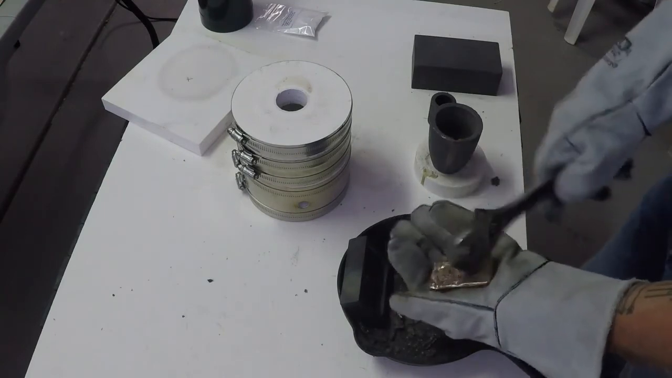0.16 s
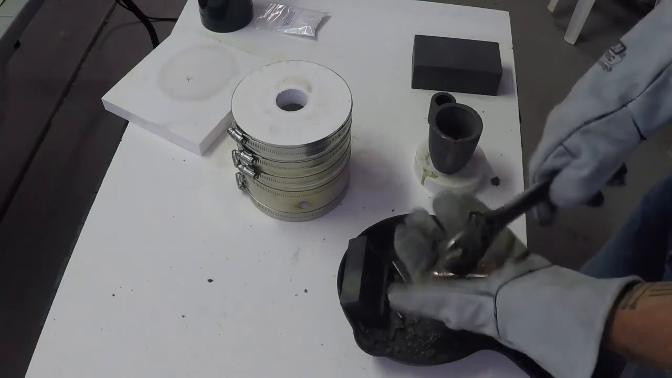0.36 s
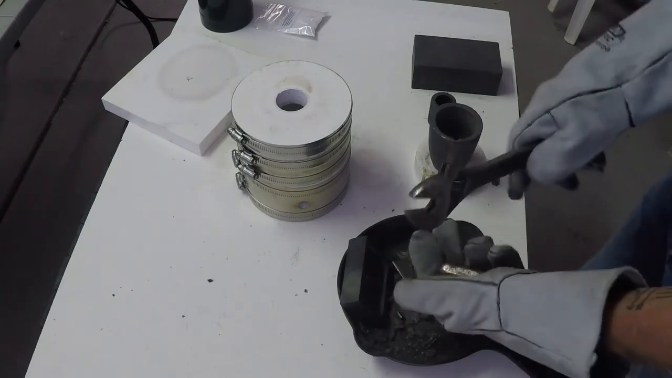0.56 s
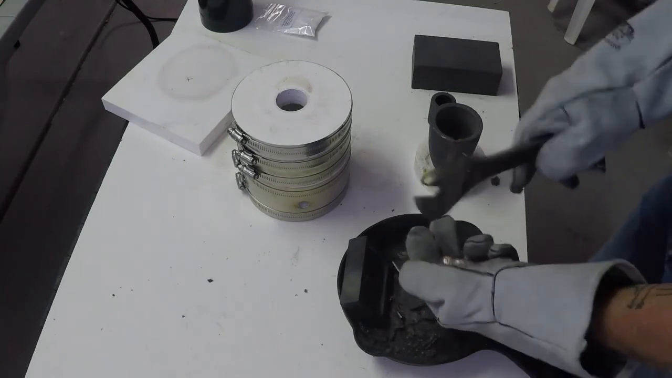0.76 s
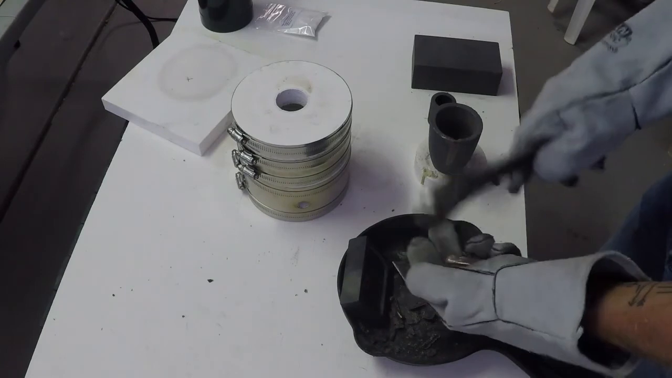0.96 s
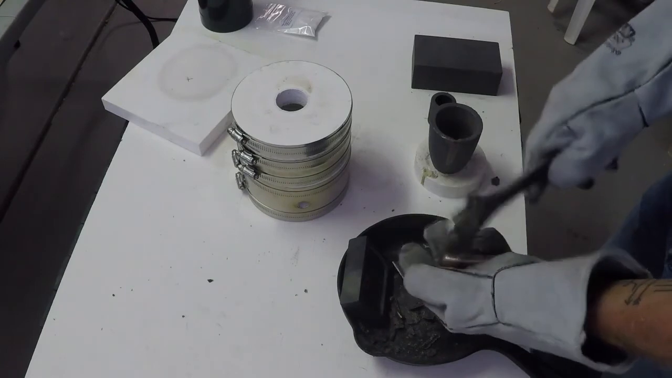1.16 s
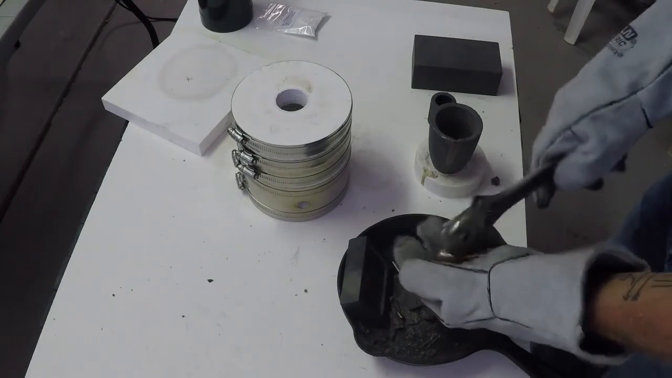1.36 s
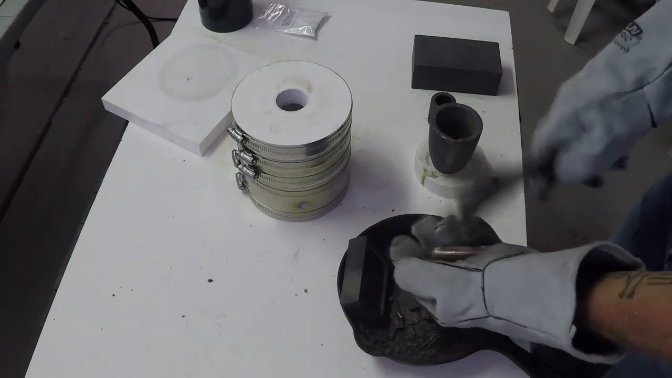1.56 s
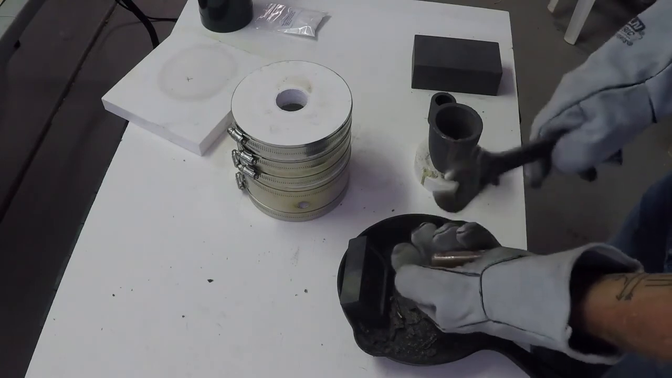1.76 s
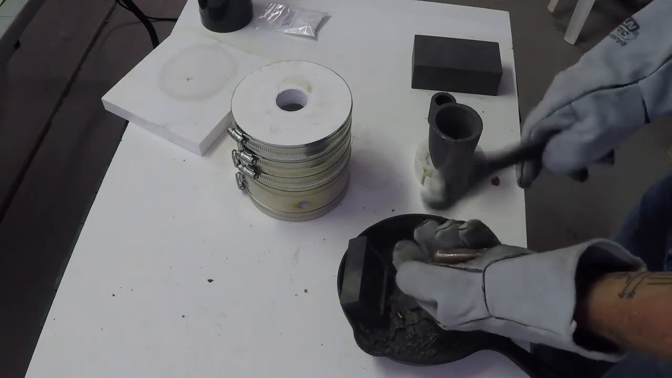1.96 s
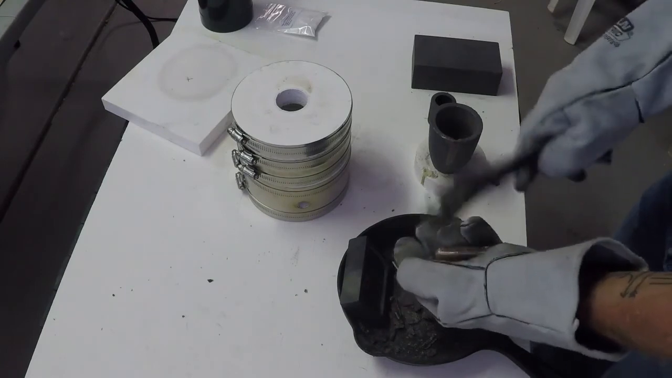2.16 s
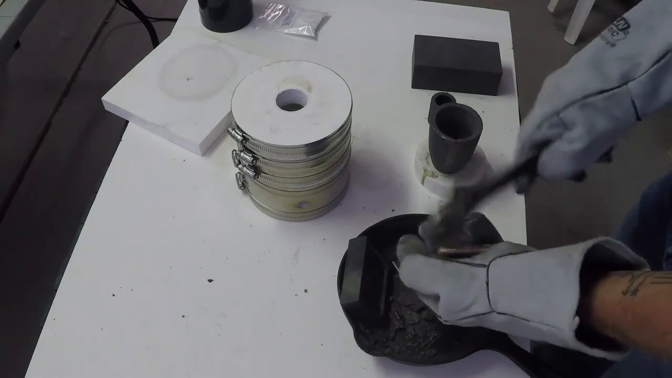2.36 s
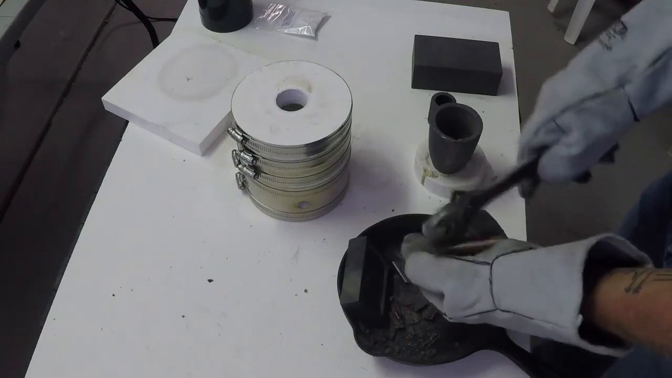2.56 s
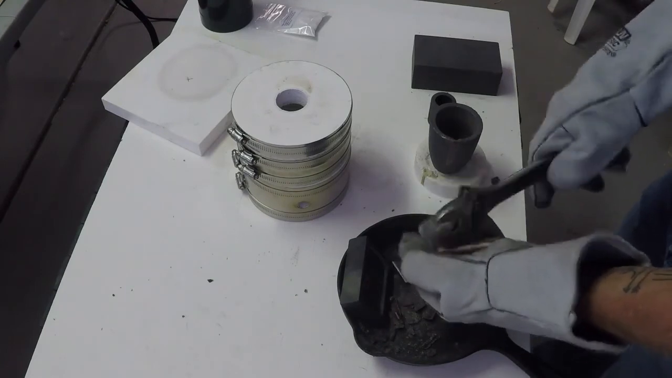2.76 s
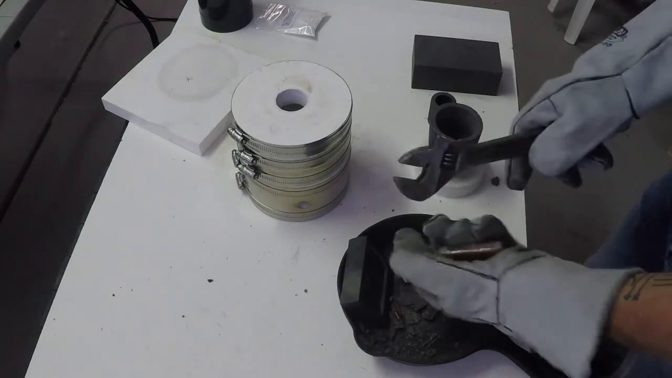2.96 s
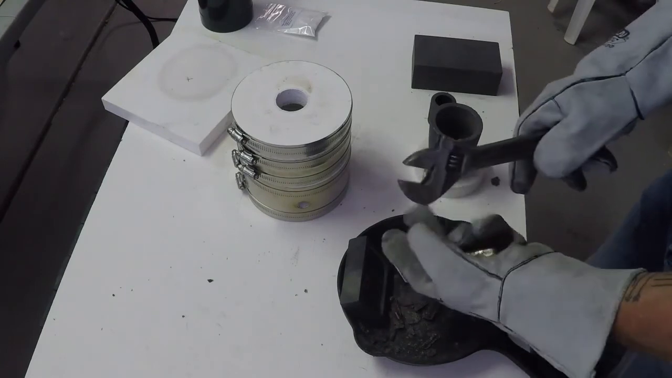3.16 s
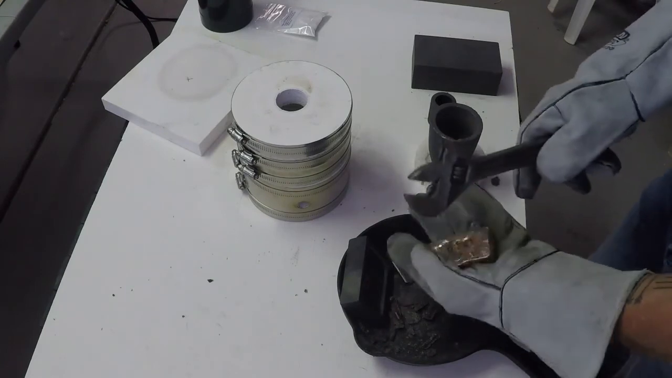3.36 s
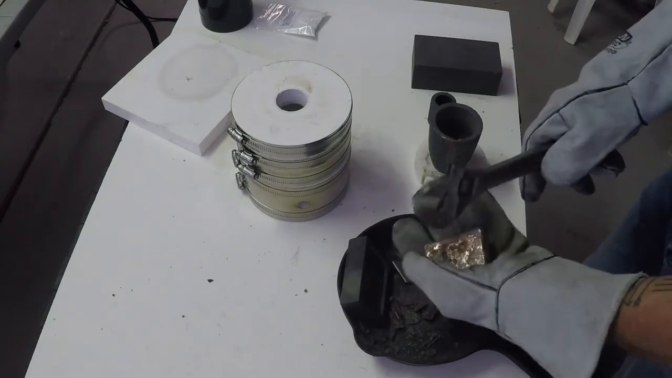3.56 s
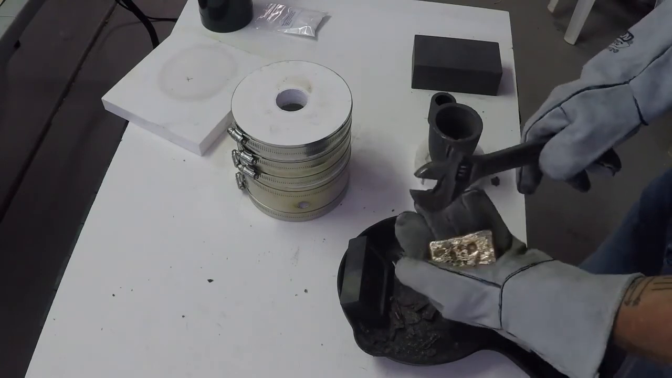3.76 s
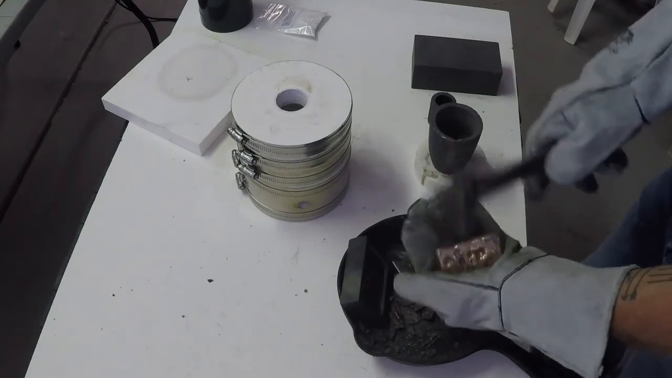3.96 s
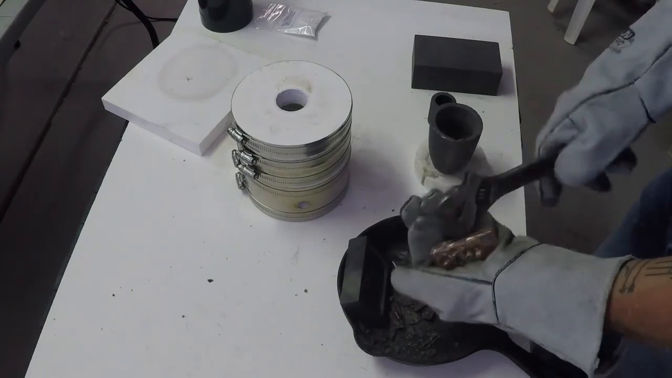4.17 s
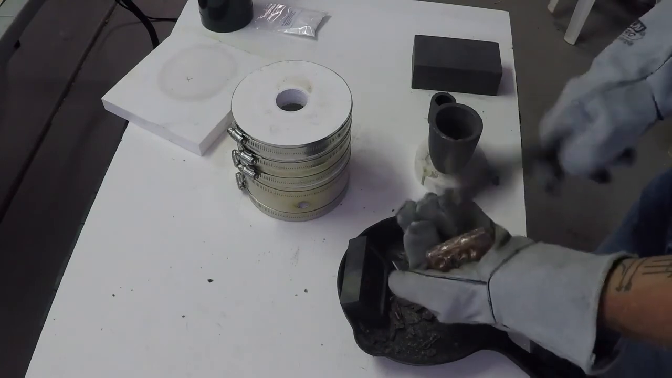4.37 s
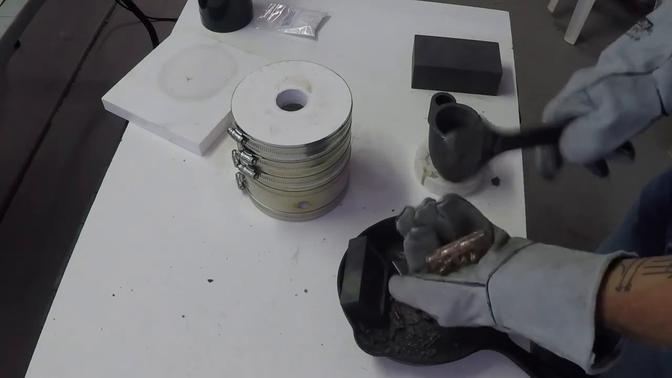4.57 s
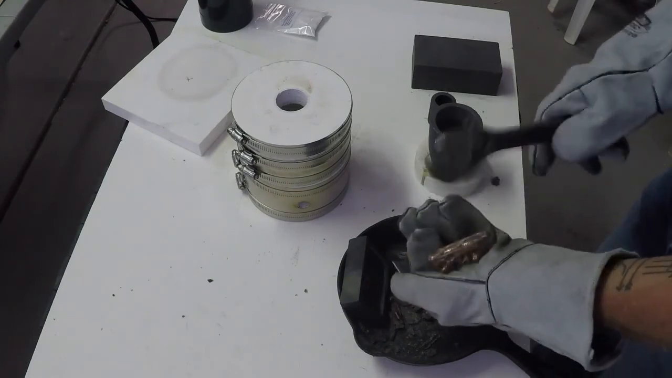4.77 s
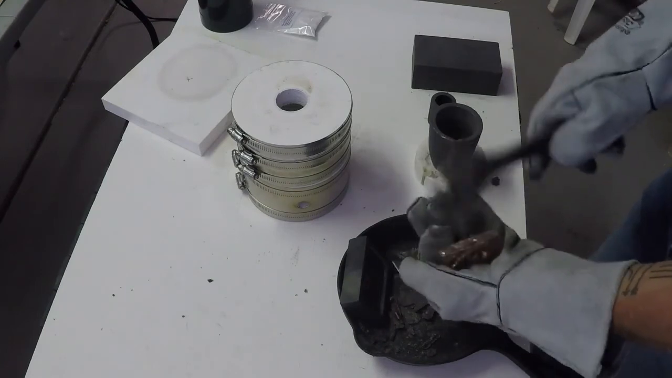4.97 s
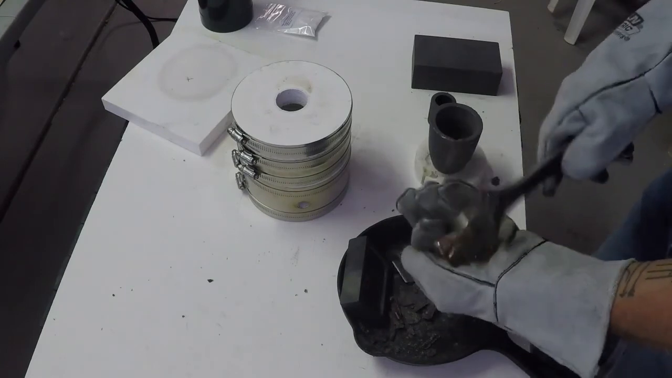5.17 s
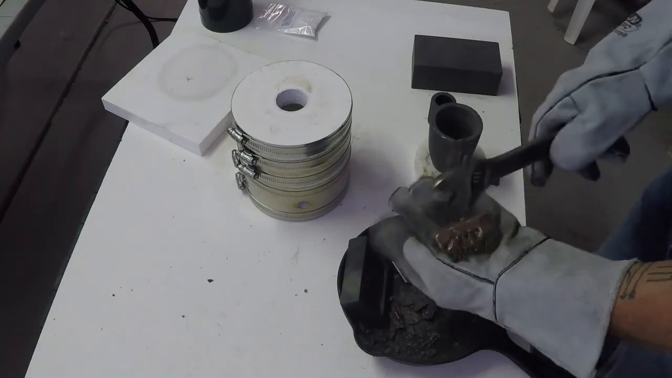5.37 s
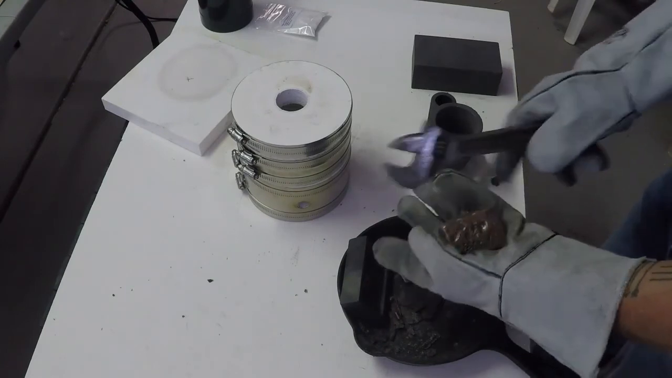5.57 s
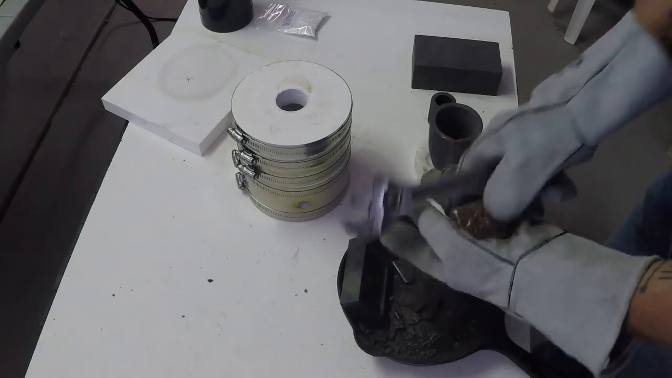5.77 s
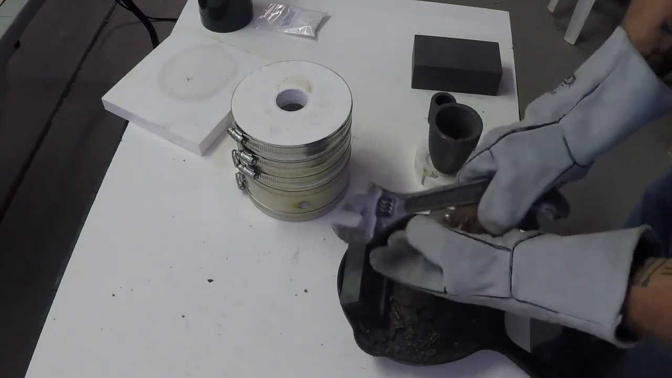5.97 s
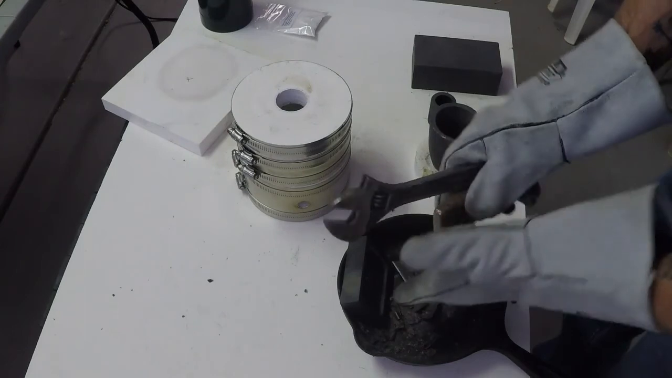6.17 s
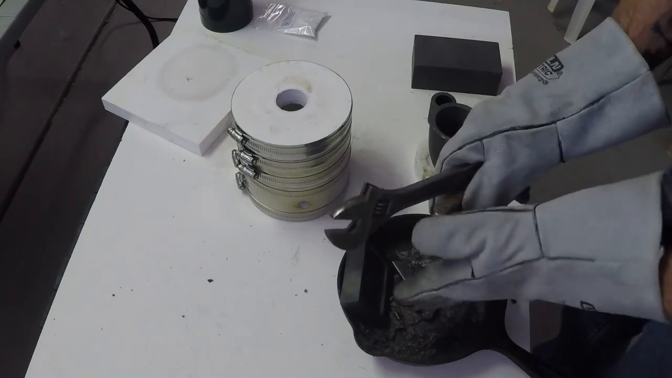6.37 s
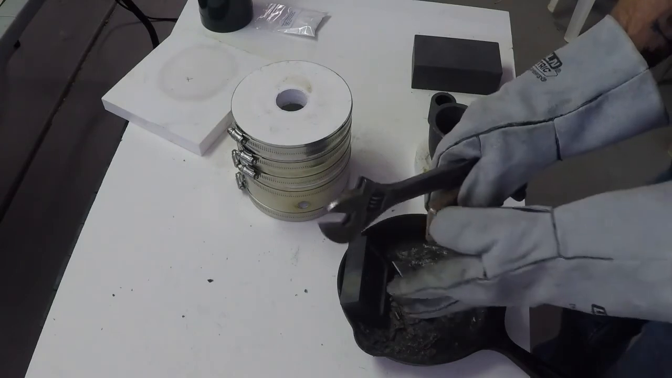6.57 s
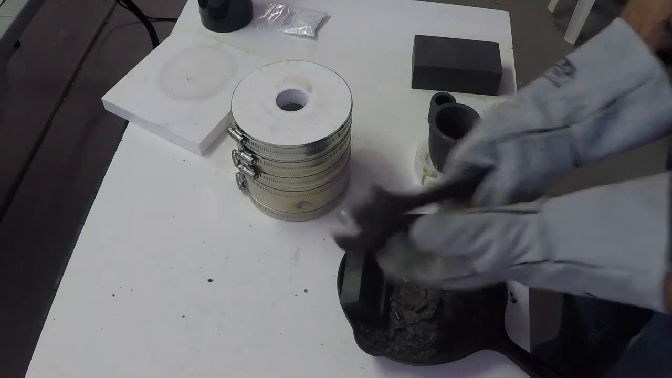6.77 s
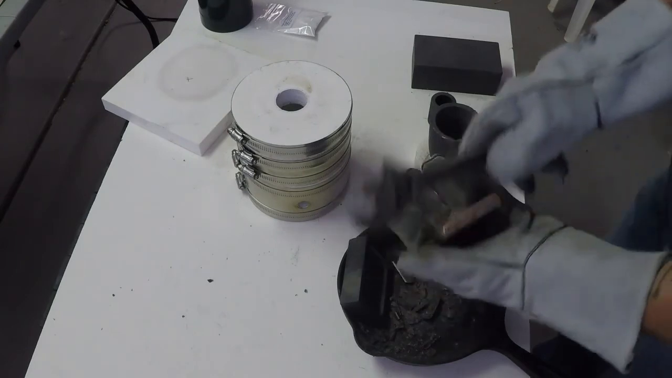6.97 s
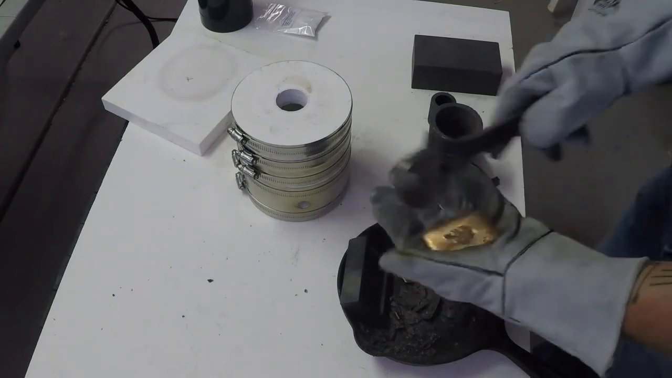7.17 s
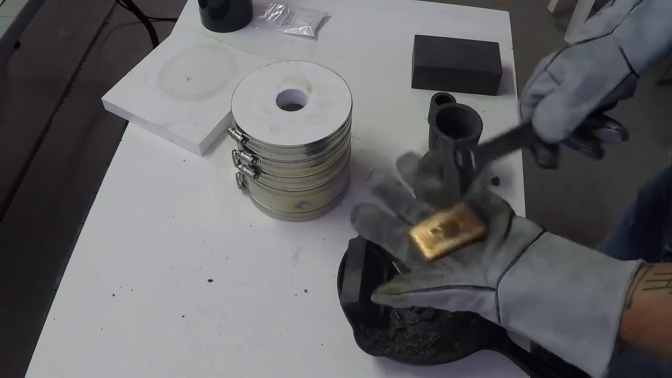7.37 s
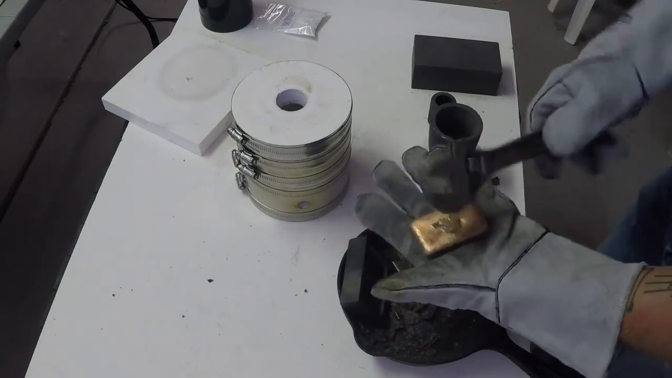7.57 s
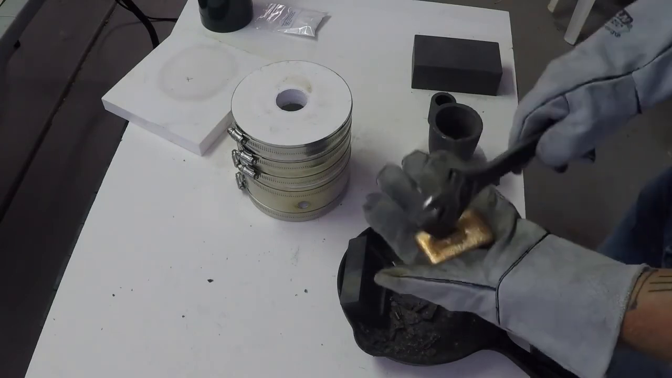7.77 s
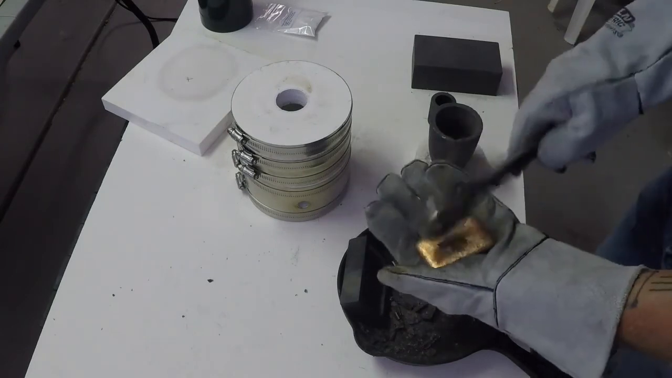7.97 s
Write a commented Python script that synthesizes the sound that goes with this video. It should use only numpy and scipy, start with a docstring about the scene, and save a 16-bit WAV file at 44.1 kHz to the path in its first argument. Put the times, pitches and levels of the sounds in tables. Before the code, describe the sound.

A close microphone in a small hard-walled workshop, with a faint low air rumble and motor hum throughout. A wrench hits a cast metal bar in a leather glove: loud, crunchy clinks at 0, 0.2 and 0.4 s, each a hard click, shattering glassy grit and a bright ring choked within hundredths of a second. The loose jaw rattles faintly around 0.6 s; a weak tap comes at 0.9. From 1.2 to 2.8 s, eight firm taps fall about every quarter second, varying in pitch and brightness. From 3.2 to 3.8 s leather slides softly and snaps as the bar is turned. Six more taps run from 4.0 to 5.2 s, the first and last lighter, some ringing brighter. Between 5.7 and 6.6 s, small dull snaps and chips tick and tinkle in an iron pan. A barely audible touch at 6.9, then a single light ringing clink at 7.8 s, with short room echo.

```python
"""Wrench tapping the crust off a metal bar

A wrench taps a cast metal bar held in a leather glove, cracking off its glassy crust of flux.
Each tap is a short pressure wave, a burst of crunchy noise and a clink of modes soon damped by the glove.
Chips tick and ring in an iron pan, gloves rub as filtered noise, and fading noise makes the workshop's echo.
A machine hums faintly behind it all, made of steady tones and coloured noise."""
import sys
import numpy as np
from scipy import signal
from scipy.fft import rfft, irfft
from scipy.io import wavfile

SR = 44100
rng = np.random.default_rng(int(sys.argv[2]) if len(sys.argv) > 2 else 0)


def int16_out(signal):
    """Quantize to a 16-bit WAV file."""
    q = np.round(np.clip(np.atleast_2d(signal).T, -1, 1) * 32767)
    wavfile.write(sys.argv[1], SR, q.astype(np.int16))


N = 354115
LEAD = SR // 10  # samples of run-up before time zero
TIME = np.arange(SR // 3) / SR  # time axis of one short sound, in seconds


def amp(db):
    """Turns decibels into a gain."""
    return 10 ** (np.asarray(db) / 20)


def evened(x):
    """Scales a signal to rms 1."""
    return x / np.sqrt(np.mean(x ** 2) + 1e-20)


def read(points, hz):
    """Reads between the points of a table, on a log-frequency axis."""
    f, value = np.transpose(points)
    return np.interp(np.log(hz + 1), np.log(f + 1), value)


def noise(spectrum, size):
    """Makes noise of rms 1 with the given colour."""
    white = rfft(rng.standard_normal(size))
    gain = amp(read(spectrum, np.fft.rfftfreq(size, 1 / SR)))
    return evened(irfft(white * gain, size))


def drift(rate, size):
    """Makes a random wander of rms 1 that holds only frequencies below rate (Hz)."""
    white = rfft(rng.standard_normal(size))
    slow = np.fft.rfftfreq(size, 1 / SR) < rate
    return evened(irfft(white * slow, size))


def add(mix, s, sound):
    """Mixes a sound in at time s (seconds); the mix begins LEAD samples early."""
    part = mix[LEAD + round(s * SR):][:len(sound)]
    part += sound[:len(part)]


def burst(rise, t60):
    """An envelope that rises quickly, then falls by 60 dB every t60 seconds."""
    return (1 - np.exp(-TIME / rise)) * np.exp(-np.log(1000) * TIME / t60)


def ring(modes, detune):
    """Sums dying sine waves; each call varies pitch and level, the level most in high modes."""
    hz, db, t60 = np.transpose(modes)[:, :, None]
    level, pitch, phase = rng.standard_normal((3, len(modes), 1))
    height = amp(db + 3 * level * hz / 10000)
    wave = np.sin(2 * np.pi * (hz * (1 + detune * pitch) * TIME + phase))
    return (height * burst(0.00014, t60) * wave).sum(0)


# The taps of the wrench, used by the knocks, the crust and the ringing bar.
# Each row: start in seconds, force in dB, flux crunch in dB, ring in dB,
# brightness of the ring in dB per octave, spot hit as a share of the bar's length.
TAPS = [(-.021, 2, -1, 3.5, -2, 0.21), (0.1964, 4.5, 2.5, 2.5, 0.7, 0.24), (0.4225, -2, -7, 7.5, 1, 0.07),
        (0.9399, -16.5, -30, -16, -7.5, .292), (1.194, -5.5, -12, -4, -4.5, 0.29),
        (1.4283, -0.5, 2.5, 4.5, -1, 0.51), (1.6661, 2, 0.5, 2.3, 2, 0.16), (1.9039, 2.5, 0, 1.5, -3, 0.13),
        (2.1302, 2, -1.5, 6, 1, .215), (2.3492, 0, 3, 2, -3.2, .2), (2.5735, -2.5, -0.5, 0, 2, 0.33),
        (2.8181, -0.5, -1.5, 5, 1.3, 0.22), (3.961, -10, -22.5, -5, -4.5, 0.32),
        (4.2236, -5, 0, 1, -0.5, .177), (4.4676, -2.5, 0, 7, 9, .25), (4.701, -3, -5, -0.9, -1.8, 0.24),
        (4.9318, -1.5, -4.5, 7, -1, 0.27), (5.1774, -13, -7, 3, -3.5, 0.26),
        (6.8939, -37, -49.5, -30.5, -12, 0.2), (7.8006, -17, -27, -3.5, 3, 0.447)]
# Colour of breaking flux, for knocks, flakes and crust. Each row: frequency in Hz, level in dB.
CRUNCH_COLOUR = [(200, -17.5), (900, -2), (2200, 0.5), (3700, 1), (5600, 4), (8300, 3), (10300, -5),
                 (13500, -5), (15000, -18), (16000, -16)]


def knocks():
    """The sudden stop of the wrench head sends up a short pressure wave with a gritty edge."""
    out = np.zeros(N + LEAD)
    u = TIME - .00065
    wave = np.exp(-(u / 0.00032) ** 2) * np.sin(2 * np.pi * 3450 * u)
    for s, force_db, *_ in TAPS:
        edge = amp(-6.5) * noise(CRUNCH_COLOUR, len(TIME)) * burst(0.00085, 0.0045)
        add(out, s, amp(force_db) * (wave + edge))
    return out


THUD_DB, THUD_GROWTH = -13.5, .5  # thud level in dB at 0 dB force, and its change in dB per dB of force
# Colour of the gloved hand's thud. Each row: frequency in Hz, level in dB.
THUD_COLOUR = [(50, -15), (200, -26.5), (400, 0.5), (650, 3.5), (1000, -1), (1400, -5.5), (2200, -5.5),
               (4000, -39)]


def crust():
    """Under each blow the flux shatters in fine grains and the gloved hand thuds, more the harder it is hit."""
    out = np.zeros(N + LEAD)
    for s, force_db, crunch_db, *_ in TAPS:
        grains = evened(np.exp(.5 * drift(2500, size=len(TIME))))
        crunch = grains * noise(CRUNCH_COLOUR, len(TIME)) * burst(0.00025, 0.019)
        thud = noise(THUD_COLOUR, len(TIME)) * burst(0.0018, 0.023)
        thud_db = THUD_DB + THUD_GROWTH * force_db
        add(out, s + 0.00046, amp(-7 + crunch_db) * crunch + amp(thud_db) * thud)
    return out


GRIP_S = .02  # time scale in seconds on which the closing glove stops the ring
NODE_DB = -13  # what is left of a mode when the blow lands on its still point (node)
HIGH_SHARE = 0.3  # how far the highest modes follow the ring rather than the crunch
# Modes of bar and wrench together, three matching lists: frequency in Hz,
# level in dB before the blow's own weighting, ring time (60 dB fall) in seconds without the glove.
MODE_HZ = [1560, 1818, 2760, 2852, 4300, 4625, 4785, 6260, 6430, 7125, 7865, 8950, 9515, 10910, 11600,
           12000, 12960, 13270, 14130]
MODE_DB = [-20.5, -20.5, -24, -8.5, -20, -11.5, -18, -20, -23, -28, -20.5, -18, -29.5, -23, -27.5, -32,
           -27.5, -19.5, -32]
MODE_T60 = [0.077, 0.036, 0.026, 0.073, 0.067, 0.026, 0.044, 0.057, 0.018, .06, 0.042, 0.14, 0.36, 0.065,
            0.069, 0.06, 0.089, 0.03, .05]
# Families of bar modes, three matching lists: frequency in Hz, number of half waves along the bar,
# level in dB when hit on a crest, before the brightness tilt.
FAMILY_HZ = [1800, 2850, 4700, 6300, 7600, 9200]
HALF_WAVES = [3, 5, 6, 7, 8, 10]
FAMILY_DB = [4.5, -3, 2, 2.2, -3.1, -6.5]


def tap(force_db, crunch_db, ring_db, bright_db, spot):
    """One clink: modes with a node at the spot hit stay quiet, the shattering crust wakes the highest."""
    shape = np.cos(np.pi * spot * np.array(HALF_WAVES)) ** 2 + amp(NODE_DB) ** 2
    octaves = np.log2(np.array(FAMILY_HZ) / 4000)
    family_db = FAMILY_DB + 10 * np.log10(shape) + bright_db * octaves
    spot_db = np.interp(MODE_HZ, FAMILY_HZ, family_db)
    high_db = HIGH_SHARE * (ring_db - 3.5) + (1 - HIGH_SHARE) * crunch_db
    weight_db = np.where(np.array(MODE_HZ) < 10000, ring_db + spot_db, high_db)
    weight_db[0] = force_db - 3  # the lowest mode is the wrench's own and follows the force alone
    clink = ring(np.c_[MODE_HZ, MODE_DB + weight_db, MODE_T60], detune=.003)
    return clink * np.exp(-(TIME / GRIP_S) ** 2)


def flake():
    """A glassy flake ticks and tinkles at random pitches of its own."""
    modes = [(hz, -16, .04) for hz in rng.uniform(2100, 12000, size=9)]
    tick = amp(2.5) * noise(CRUNCH_COLOUR, len(TIME)) * burst(0.00071, 0.02504)
    return tick + ring(modes, detune=0)


RATTLE_STEP_S, RATTLE_FALL_DB = .038, 3  # average time and loss from click to click
# The wrench grazing the bar just before a blow. Each row: start in seconds, level in dB.
GRAZES = [(0.178, -32.5), (0.406, -15.5), (0.413, -17)]
# The loose jaw rattling. Each row: start in seconds, first click's level in dB, number of clicks.
RATTLES = [(.567, -32, 1), (.592, -25.5, 5), (3.562, -34.5, 1), (6.0956, -41, 1)]
# Modes of the wrench's loose jaw. Each row: frequency in Hz, level in dB, ring time in seconds.
JAW = [(1624, -7, 0.086), (3050, -7.5, .07), (4020, -19.5, .04), (5300, -15.5, 0.19), (6200, -16, 0.078)]


def wrench():
    """Blows ring the bar just after first contact; grazes and rattles ring the wrench's jaw."""
    out = np.zeros(N + LEAD)
    for s, *blow in TAPS:
        add(out, s + .0005, tap(*blow))
    for s, db in GRAZES:
        add(out, s, amp(db) * ring(JAW, detune=.004))
    for s, db, count in RATTLES:
        for k in range(round(count)):
            click = amp(-6.5) * ring(JAW, detune=0.0038) + amp(-9) * flake()
            start = s + k * RATTLE_STEP_S + 0.0017 * rng.standard_normal()
            add(out, start, amp(db - k * RATTLE_FALL_DB) * click)
    return out


# Last crumbs into the pan: start and length in seconds, level in dB on the scale of the chips.
TRICKLE_S, TRICKLE_LENGTH_S, TRICKLE_DB = 6.435, .125, -44
# Flux chips falling. Each row: start in seconds, relative level in dB, relative ring of the pan in dB.
CHIPS = [(.156, -30.5, -8), (.3823, -23, -5), (1.1104, -39, -24), (1.3718, -38.5, -19), (5.7372, -31, -22),
         (5.7985, -37, 1), (6.2109, -22, 7.5), (6.262, -25, -4), (6.278, -25, 3), (6.318, -36, 4)]
# Modes of the iron pan. Each row: frequency in Hz, level in dB, ring time in seconds.
PAN = [(3110, -27, .25), (3295, -16, 0.35), (4220, -16, 0.12), (5130, -10, 0.099), (6730, -7.5, 0.063),
       (7100, -17.5, 0.14), (9780, -16, 0.094), (11150, -19, .1)]


def chips():
    """Each chip lands, rings the pan, and skitters on in bounces that are weaker the later they come."""
    out = np.zeros(N + LEAD)
    places = (np.arange(5) + rng.random(size=5)) / 5
    crumbs = [(TRICKLE_S + TRICKLE_LENGTH_S * u, TRICKLE_DB, 1) for u in places]
    for s, db, pan_db in list(CHIPS) + crumbs:
        landing = flake() + amp(pan_db - 1.0) * ring(PAN, detune=0)
        add(out, s, amp(db - 3.0) * landing)
        for delay in rng.uniform(.004, .05, size=4):
            add(out, s + delay, amp(db - 12.5 - 110 * delay) * flake())
    return out


GRIT_DB, GRIT_HZ = 4.5, 2480  # small snaps in a stroke: dB added to the stroke's table level, centre in Hz
# Gloves sliding as the bar is turned over.
# Each row: start in seconds, length in seconds, relative level in dB.
STROKES = [(3.196, 0.14, -46.5), (3.298, 0.18, -43), (3.536, .2, -43)]
# Colour of sliding leather. Each row: frequency in Hz, level in dB.
LEATHER_COLOUR = [(200, -19), (600, -3), (1300, -1.5), (2800, -2.5), (5000, -10), (8000, -20.5),
                  (14000, -29)]
# Dull snaps of leather and crust in the hand.
# Each row: start in seconds, relative level in dB, centre frequency in Hz.
SNAPS = [(.925, -28, 3100), (3.627, -33.5, 2630), (3.7204, -24.5, 2200), (3.771, -32.5, 1920),
         (5.863, -35.5, 4070), (5.902, -33, 1980), (5.903, -23.5, 680), (6.896, -31.5, 618),
         (7.2344, -33, 3450)]
# Colour of one snap. Each row: multiple of its centre frequency, level in dB.
SNAP_COLOUR = [(.15, -8), (0.652, -5.5), (1, 7.5), (1.5, -5), (4, -38)]


def gloves():
    """Leather slides in uneven catches, crackles with grit and snaps over the crust."""
    t = (np.arange(N + LEAD) - LEAD) / SR
    slide = sum(amp(db) * np.sin(np.pi * np.clip((t - s) / length, 0, 1)) for s, length, db in STROKES)
    catches = evened(amp(3.5 * drift(60, size=len(t)) + 3.5 * drift(500, size=len(t))))
    out = amp(-3.0) * slide * catches * noise(LEATHER_COLOUR, len(t))
    grit = []
    for s, length, db in STROKES:
        for u in rng.beta(2, 2, size=2):
            grit.append((s + length * u, db + GRIT_DB, GRIT_HZ))
    for s, db, hz in list(SNAPS) + grit:
        colour = [(hz * multiple, level) for multiple, level in SNAP_COLOUR]
        add(out, s, amp(db + 1.0) * noise(colour, len(TIME)) * burst(0.00058, 0.014))
    return out


# How fast each band of the room dies. Each row: frequency in Hz, time to fall by 60 dB in seconds.
ROOM = [(150, 0.31), (600, 0.42), (1800, 0.46), (4500, 0.42), (8000, 0.35), (14000, 0.3)]


def room_tail():
    """Dense reflections that build up quickly, each band dying at its own speed."""
    hz, t, z = signal.stft(rng.standard_normal(SR // 2), SR, nperseg=256)
    decay = np.exp(-np.log(1000) * t / read(ROOM, hz)[:, None])
    tail = signal.istft(z * decay, SR, nperseg=256)[1]
    tail *= 1 - np.exp(-(np.arange(len(tail)) / SR / 0.0099) ** 2)
    return tail / np.linalg.norm(tail)


def workshop(x):
    """Reflections from table and walls; three tails trade places steadily, for the moving hands."""
    turn = np.pi * 1.3 * np.arange(len(x)) / SR
    wet = np.zeros(len(x))
    for k in range(3):
        share = x * np.cos(turn + k * np.pi / 3)
        wet += amp(-10.5) * signal.fftconvolve(share, room_tail())[:len(x)]
    # single early echoes: delay in seconds, level in dB
    for delay, db in [(.0027, -38), (.0075, -18), (.033, -20)]:
        wet += amp(db) * np.pad(x, (round(delay * SR), 0))[:len(x)]
    return wet


AIR_DB = -47.5  # rms level of the moving air
SWELL_HZ, SWELL_DB = 2.7, 1.3  # fastest rate and rms depth of the slow swell of the rumble
# Colour of the moving air. Each row: frequency in Hz, level in dB.
AIR_COLOUR = [(12, -29.5), (20, -3.5), (43, -3), (146, -22.5), (228, -14.5), (357, -14.5), (388, -20),
              (499, -17.5), (1610, -26.5), (2820, -37.5), (3340, -37), (4540, -38.5), (5380, -42.5),
              (14300, -53.5), (16000, -71.5)]
# Lines of the motor. Each row: frequency in Hz, level in dB.
HUM = [(32.5, -51.5), (48, -69.5), (120, -65), (216, -53), (240, -50.5), (360, -56)]


def machine():
    """Moving air, a rumble that swells slowly, and the wavering lines of a motor."""
    t = np.arange(N) / SR
    hum = sum(amp(db) * np.sin(2 * np.pi * hz * t + .5 * drift(4.5, size=N)) for hz, db in HUM)
    steady = hum + amp(AIR_DB) * noise(AIR_COLOUR, N)
    low = signal.sosfiltfilt(signal.butter(2, 90, fs=SR, output="sos"), steady)
    swell = amp(SWELL_DB * drift(SWELL_HZ, size=N))
    return steady + low * (swell - 1)


def scene():
    """The knock is aimed at the microphone, ring and crust radiate all round, and the hand screens the pan."""
    knock, clink, crunch, debris = knocks(), wrench() + gloves(), crust(), chips()
    room = workshop(amp(-7) * knock + amp(-0.5) * clink + amp(2.0) * crunch + amp(-1.0) * debris)
    taps = knock + clink + crunch + amp(-4.5) * debris + room
    mono = taps[LEAD:] + machine()
    return np.array([mono, mono])


EDGE_HZ = 15600  # upper band limit


def record(dry):
    """The loudest peaks overload softly; then a low-pass filter removes the top of the treble."""
    clipped = dry / (1 + dry ** 6) ** (1 / 6)
    lowpass = signal.firwin(161, EDGE_HZ, window=("kaiser", 9), fs=SR)
    return signal.oaconvolve(clipped, lowpass[None], "same")


dry = scene()
out = record(dry)
int16_out(out)
```